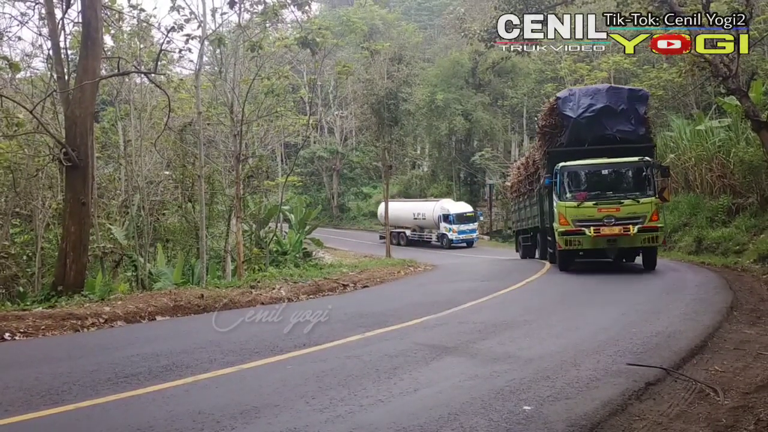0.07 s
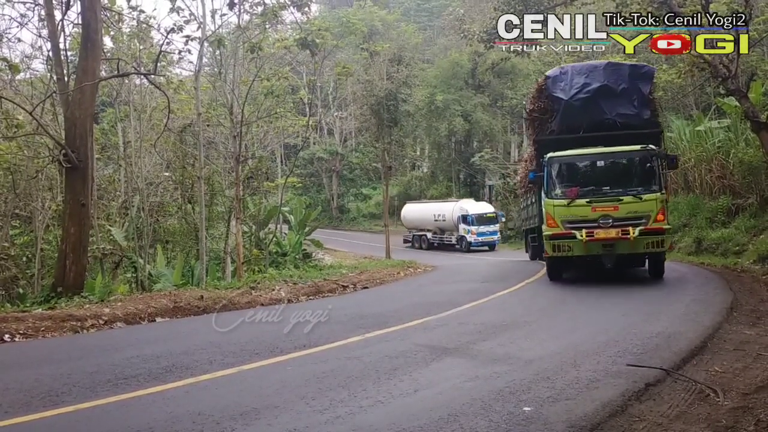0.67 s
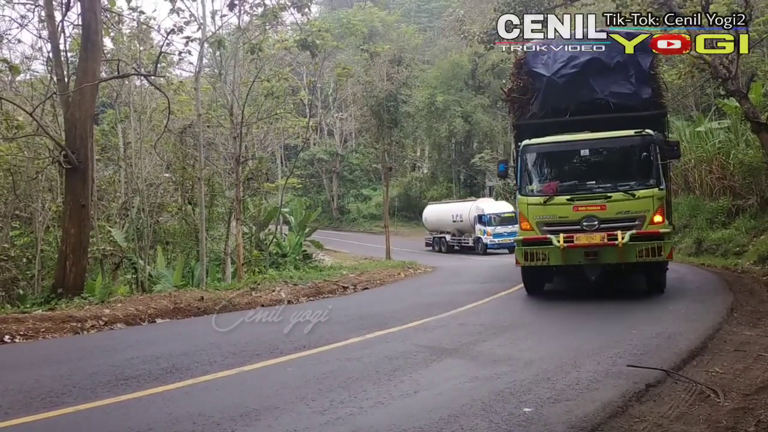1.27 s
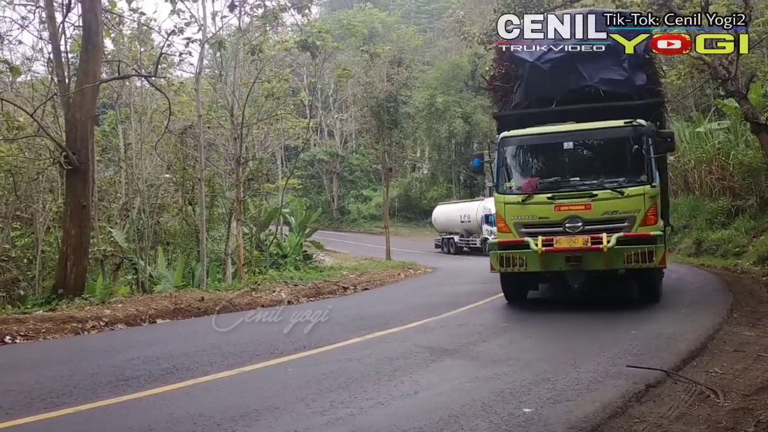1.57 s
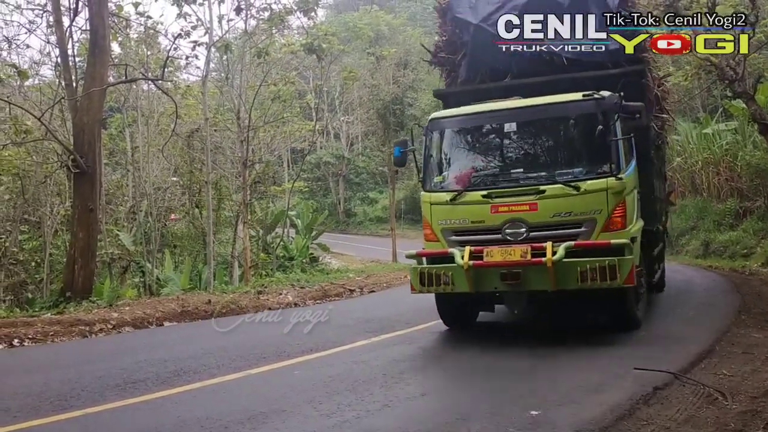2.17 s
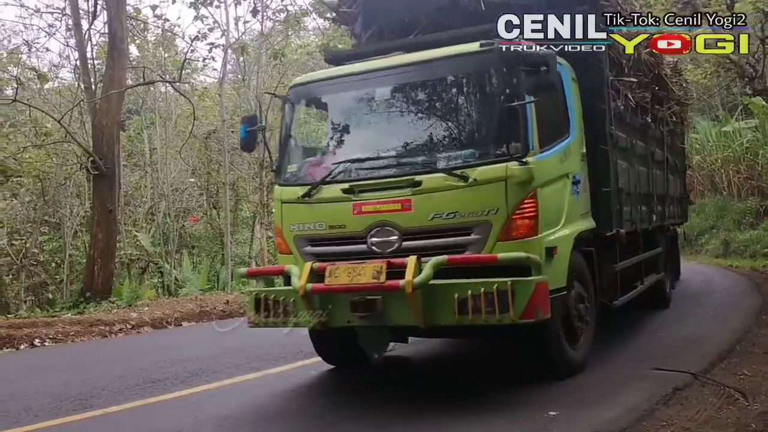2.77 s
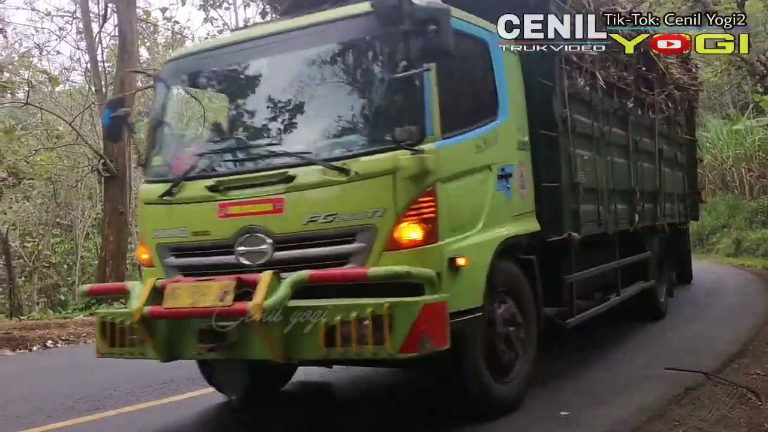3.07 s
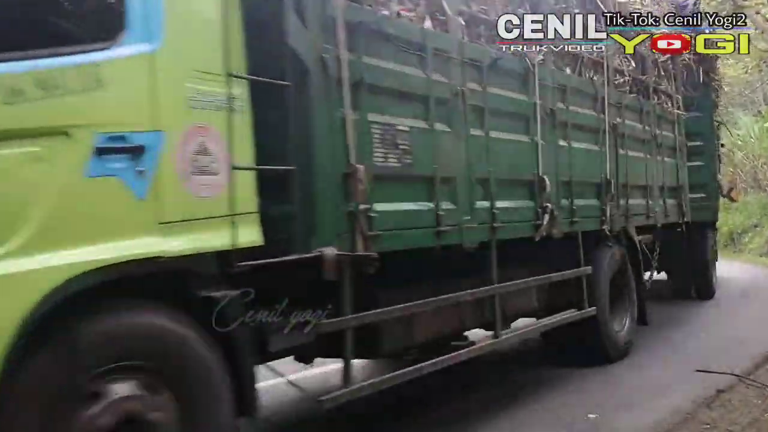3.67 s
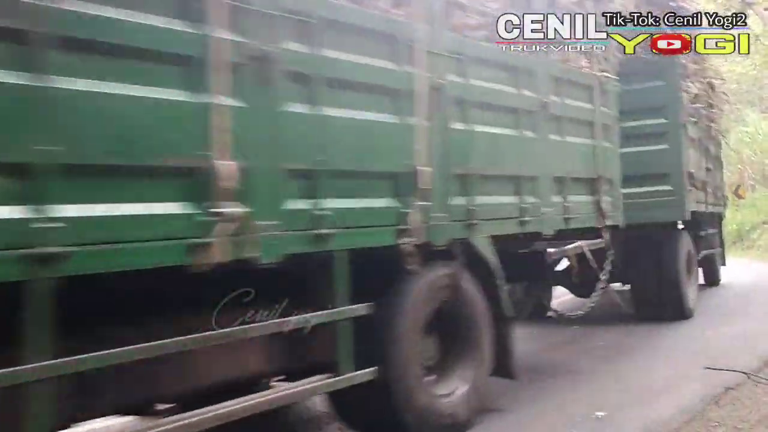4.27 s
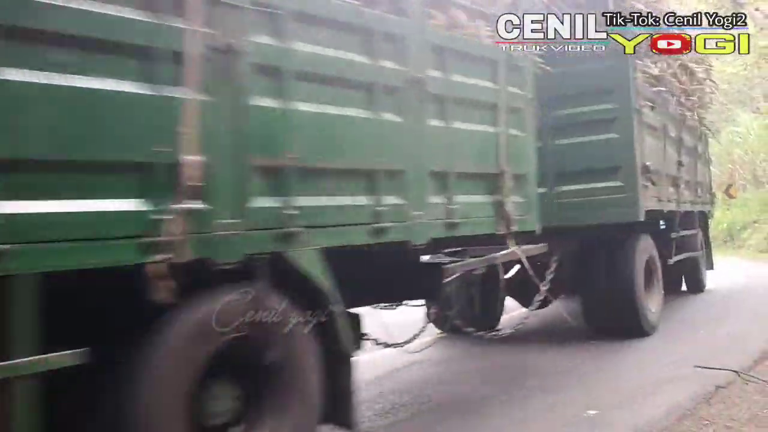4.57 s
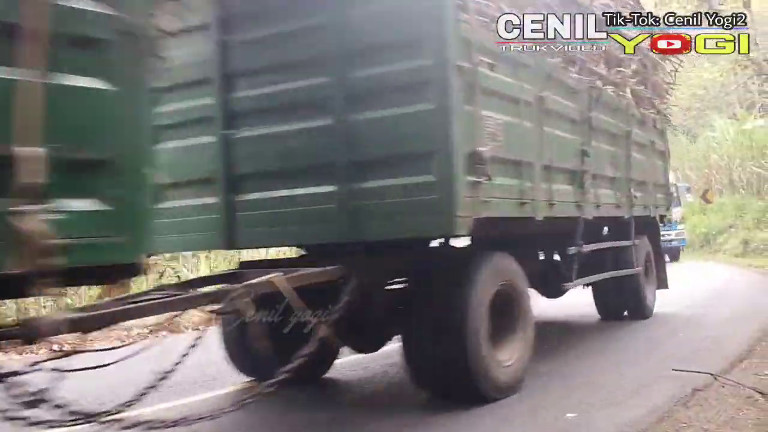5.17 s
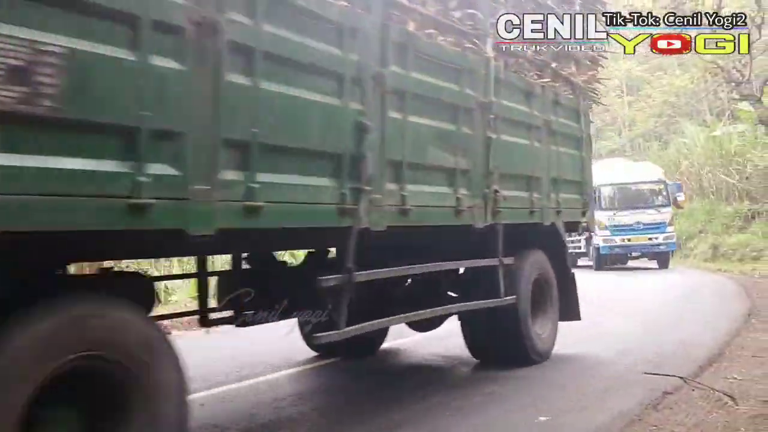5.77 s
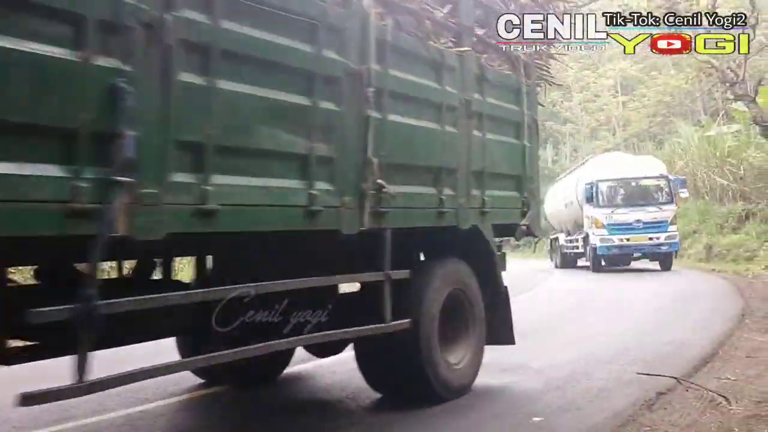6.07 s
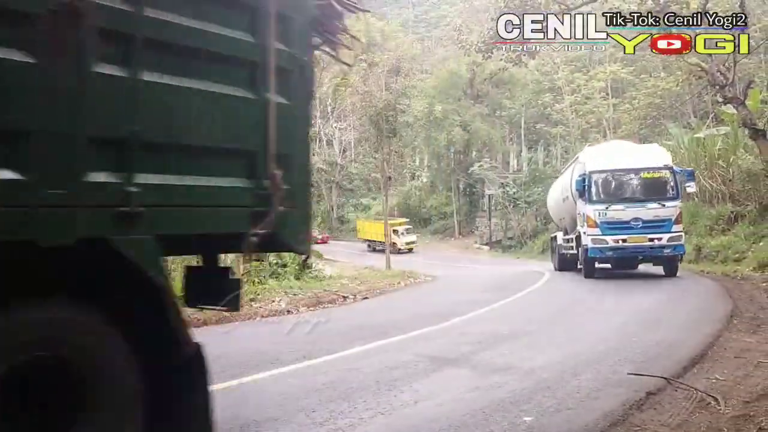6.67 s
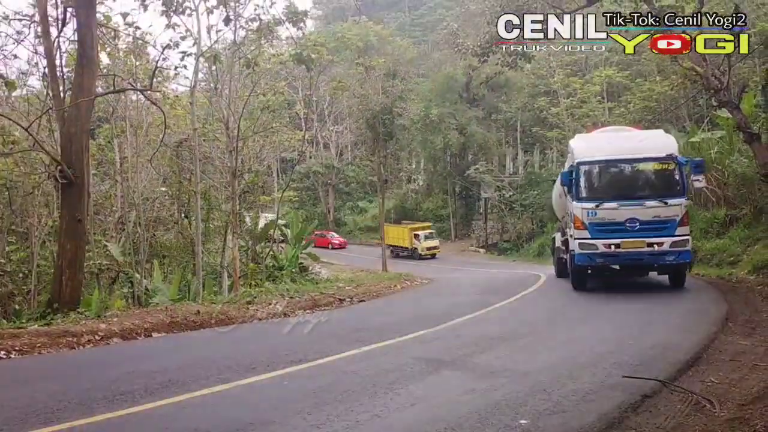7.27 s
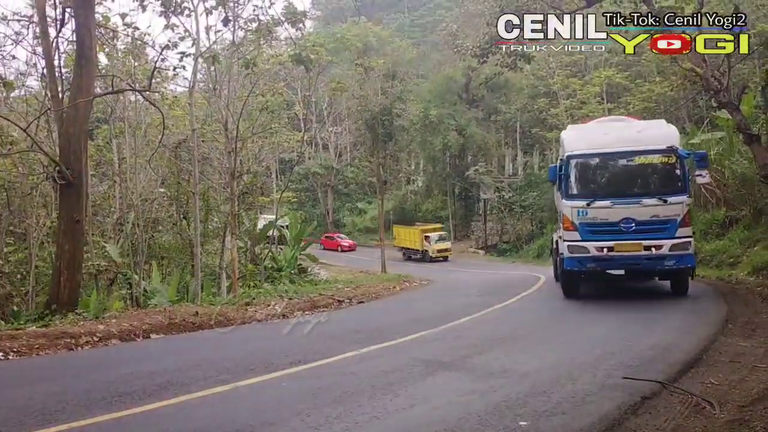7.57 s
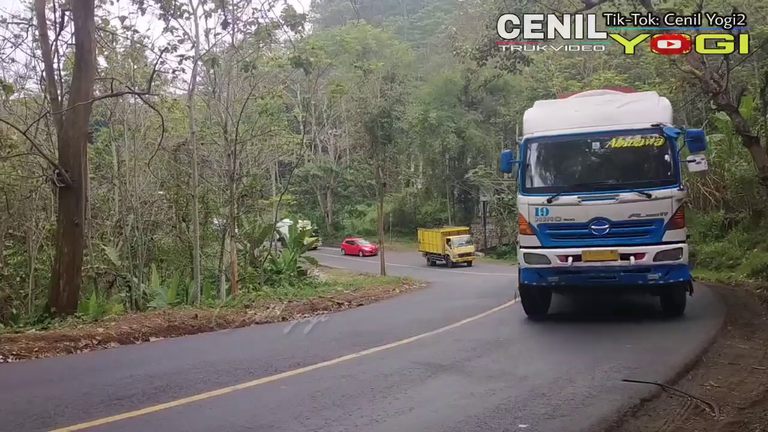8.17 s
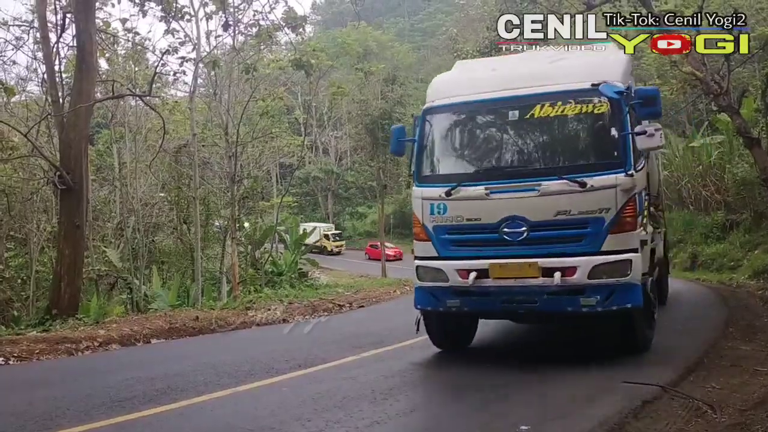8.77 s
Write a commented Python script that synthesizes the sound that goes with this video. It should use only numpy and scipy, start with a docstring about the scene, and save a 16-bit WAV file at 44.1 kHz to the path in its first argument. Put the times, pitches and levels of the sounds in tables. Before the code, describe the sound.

Heard from the verge of a forest road, a heavy truck's deep engine drone and rumble build steadily. After a short puff of air, the truck and its trailer go by close, with throbbing exhaust, roaring, hissing tyres and a gassy rasp with a thin metal ring. The noise drops away with a light, high squeal, leaving the lower hum of a following tanker and faint distant traffic.

```python
"""A low exhaust boom grows over road noise as a loaded six-cylinder diesel truck with a drawbar trailer
climbs a forest bend and passes a few metres away. Periodic firings give the boom and its overtones;
the block clatters, the tyres roar and hiss, metal rings thinly and gas rasps beside the pipe. A hollow
drone and a spit of air come before the pass, a thin squeal after it. A tanker follows, and the two
exhaust notes, close in frequency, beat."""
import sys
import numpy as np
from scipy import signal
from scipy.fft import rfft, irfft
from scipy.io import wavfile
from scipy.ndimage import uniform_filter1d, minimum_filter1d

SR = 44100
rng = np.random.default_rng(int(sys.argv[2]) if len(sys.argv) > 2 else 0)


def pcm_store(signal):
    """Save signal as 16-bit PCM."""
    levels = np.round(np.clip(np.atleast_2d(signal), -1, 1) * 32767)
    wavfile.write(sys.argv[1], SR, levels.astype(np.int16).T)


N = 388521
TIME = np.arange(N) / SR

# The truck's exhaust note, swelling and fading as the pipe moves round the bend.
# Each row: time in seconds, firing rate in Hz, level in dB.
TRUCK_EXHAUST = [(0, 87, -29), (.85, 82.7, -22.5), (1.1, 81.5, -24), (1.5, 80.2, -18.5),
                 (2.25, 78.3, -20.5), (3.4, 79.1, -13), (4.43, 80.5, -9), (4.85, 81.9, -2.8),
                 (5.32, 82.9, -8.5), (5.72, 84.2, -5), (6.13, 86.7, -9), (6.5, 85.6, -18),
                 (6.85, 86.4, -30), (7.22, 87.4, -21), (7.54, 86.1, -26), (7.95, 85, -47),
                 (8.38, 85.6, -28), (8.81, 86.2, -28)]
# The truck's overtones. Each row: multiple of the engine cycle, then relative level in dB from far in
# front, beside the cab, beside the flank and from behind.
TRUCK_OVERTONES = [(3, -15, -20, -14.5, -9.5), (4, -20, -16.5, -19, -12), (5, -21, -13, -18.5, -10),
                   (7, -26, -20, -15, -3.5), (8, -18, -11.5, -19, -9), (8.99, -14, -5.5, -5.5, 0),
                   (10.01, -17, -15.5, -18.5, -1.5), (10.95, -7.5, -4, -3.5, -14.5), (11.97, 1, -1, 1, -6),
                   (13, -21, -21.5, -11.5, -17.5), (15.1, -13, -13.5, -14, -12.5),
                   (16, -20, -18, -18, -17.5), (17.94, -18, -9, -12, -15.5), (18.97, -2, -3, -9.5, -11),
                   (20.86, -18, -16, -18.5, -21), (23.46, -12.5, -10, -9.5, -14.5),
                   (26.9, -21.5, -18.5, -14.5, -17), (30.07, -22, -22, -14, -16),
                   (36.1, -30, -26, -17.5, -19), (38, -19, -21.5, -19, -24), (42, -26, -21.5, -15, -23),
                   (60, -22, -21.5, -21, -31), (78, -25, -24.5, -24.5, -32)]
# The gain common to those overtones. Each row: time in seconds, gain in dB.
OVERTONE_GAIN = [(0, -35), (1.3, -34), (2.7, -29.5), (3.6, -28.7), (4.4, -21.7), (5.15, -23.7),
                 (6.4, -27.8), (7, -38), (8.81, -46)]
# The side facing the listener.
# Each row: time in seconds, side (0 far front, 1 cab, 2 flank, 3 trailer, 4 tanker).
FACING_SIDE = [(0, 0), (1.3, 0), (2.4, .9), (3.4, 1), (4.3, 1.75), (5.3, 2.5), (6.8, 3.1), (7.4, 4)]
# Spectra of the chassis rumble, the roar from each side, the hiss and the spit of air.
# Each row: frequency in Hz, relative level in dB.
RUMBLE_SPECTRUM = [(15, -18), (30, -4), (60, -2.5), (130, -1.5), (200, -0.7), (270, -1), (340, 3),
                   (420, -2), (520, -13), (700, -20.5)]
ROAR_FRONT = [(450, -3), (650, -1), (780, 2.5), (950, -4), (1080, 0.5), (1380, -4), (1800, -4.5),
              (2080, -6), (2380, -8), (2620, 0.5), (2850, -5.5), (3080, -2), (3400, -4), (3620, -2),
              (4100, -11.5)]
ROAR_CAB = [(450, -6.5), (570, -1), (780, 2), (1100, -0.5), (1550, -5), (2300, -8), (2850, -2),
            (3200, -1.5), (3700, -1), (4100, -4)]
ROAR_FLANK = [(450, 5), (650, 1), (900, 2), (1350, 3.2), (2100, 2), (2650, 3.5), (3100, 4), (3600, 1),
              (4100, -13.5)]
ROAR_TRAILER = [(450, -2.5), (700, 1), (1000, -3.5), (1500, 0.5), (2000, 1.2), (2600, 3.5), (2850, 2.5),
                (3050, 0), (3350, 1.2), (4100, -7.5)]
ROAR_TANKER = [(450, 0), (700, 1.5), (1000, -0.5), (1350, 3), (1650, -0.5), (2000, 1.2), (2800, 2),
               (3200, -1.5), (4100, -6)]
HISS_SPECTRUM = [(3400, -26), (4100, -5), (4700, -2.5), (5300, -4), (6000, -1.5), (6600, -1.5), (7100, -.5),
                 (7500, 3), (7800, -2), (8100, -11.5), (8400, -24)]
SPIT_SPECTRUM = [(3000, -17), (6300, -16), (7300, 1), (7700, -5), (8300, -19)]
# The passage of each truck sound. Each entry: time abreast in seconds, level then in dB, nearest
# distance in metres, loss in dB per doubling of distance while approaching and while receding.
TRUCK_PASSES = {"rumble": (4.85, -28.4, 4, 8, 15), "roar": (4.68, -21.6, 5, 18, 14.8),
                "hiss": (4.92, -24.1, 5, 12.2, 16.8), "ring": (5.35, -33.5, 1.6, 4.9, 9.5),
                "rasp": (5.2, -23.8, 1.6, 16.5, 15)}
# Other traffic. Each entry: level in dB of the tanker at its nearest, level in dB of distant vehicles.
OTHER_TRAFFIC = {"rumble": (-39.5, -51), "roar": (-47, -40.6), "hiss": (-40, -42.9)}
# A metallic ringing that travels with the truck. Each row: time in seconds, frequency in Hz.
RINGING_PITCH = [(0, 3040), (1.3, 3160), (3.7, 3200), (4.6, 3100), (5.3, 3130), (6.3, 3045), (7.3, 2940)]
# The tanker's exhaust note. Each row: time in seconds, firing rate in Hz, level in dB.
TANKER_EXHAUST = [(3.0, 73.7, -44), (5.3, 71.65, -33.5), (6.8, 73, -35), (7.15, 73.5, -28.5),
                  (7.5, 74.3, -34), (7.8, 74.15, -24), (8.35, 76.3, -25), (8.81, 78.7, -27)]
# Its overtones. Each row: multiple of the engine cycle, level in dB relative to the exhaust note.
TANKER_OVERTONES = [(11, -25), (12, -18), (16, -24), (18, -24), (24, -22), (28, -22)]
# Resonances of the rasp. Each row: frequency in Hz, bandwidth in Hz, relative level in dB.
GAP_RESONANCES = [(3117, 450, 5), (3700, 130, -6), (2600, 300, -9.5), (8100, 1800, -21.5)]
# Flares of ringing and rasp.
# Each row: start in seconds, length in seconds, ringing level in dB, rasp level in dB.
FLARES = [(3.62, .3, -31.5, -42), (4.52, .5, -31, -23.2), (5.03, .25, -24.5, -17.8), (6.2, .14, -35, -42),
          (6.52, .13, -34, -45), (6.92, .1, -42, -50)]


def undb(db):
    """Amplitude grows tenfold for every 20 dB."""
    return 10 ** (np.asarray(db) / 20)


def unit(x):
    """Normalisation to an rms of 1."""
    return x / np.sqrt(np.mean(x ** 2))


def curves(table):
    """Linear interpolation in time gives each later column a value per sample."""
    times, *columns = np.transpose(table)
    return [np.interp(TIME, times, column) for column in columns]


def wander(rate_hz):
    """Low-passed noise of rms 1 fluctuates about rate_hz times a second."""
    step, size = 20, 20000
    hz = np.arange(size // 2 + 1) * SR / step / size
    bins = rfft(rng.standard_normal(size)) * np.exp(-(hz / rate_hz) ** 2)
    return np.interp(np.arange(N) / step, np.arange(size), unit(irfft(bins)))


def noise(spectrum, band_hz=(0, SR)):
    """Spectral shaping of white noise, with steep skirts; the rms is 1 within the band."""
    hz = np.maximum(np.arange(N // 2 + 1) * SR / N, 1)
    points, db = np.transpose(spectrum)
    colour = undb(np.interp(np.log(hz), np.log(points), db))
    skirts = np.minimum(1, np.minimum(hz / points[0], points[-1] / hz)) ** 10
    bins = rfft(rng.standard_normal(N)) * colour * skirts
    low, high = band_hz
    return irfft(bins, N) / np.std(irfft(bins * (hz > low) * (hz < high), N))


def envelope(start, length, attack, release):
    """A linear rise and a hold give way to exponential decay; all times are in seconds."""
    age = TIME - start
    return np.clip(age / attack, 0, 1) * np.exp(-np.maximum(age - length, 0) / release)


def exhaust_note(firings, db, shake):
    """A silencer is a low-pass filter: it rounds the firings to an almost pure boom."""
    return np.sqrt(2) * undb(db) * np.cos(2 * np.pi * firings) * (1 + shake * wander(11))


def overtone(firings, order, unsteady, rate_hz):
    """Uneven combustion modulates a multiple of the six-firing cycle in amplitude and phase."""
    angle = 2 * np.pi * (order * firings / 6 + rng.random())
    in_phase = (1 + unsteady * wander(rate_hz)) * np.cos(angle)
    quadrature = unsteady * wander(rate_hz) * np.sin(angle)
    return np.sqrt(2 / (1 + 2 * unsteady ** 2)) * (in_phase + quadrature)


def truck_engine(firings, note_db, side):
    """Unequal cylinders and driven gear add overtones to the boom; directivity sets their balance."""
    gain_db, = curves(OVERTONE_GAIN)
    overtones = 0
    for order, *side_db in TRUCK_OVERTONES:
        directivity = undb(np.interp(side, range(4), side_db))
        overtones += directivity * overtone(firings, order, unsteady=.25, rate_hz=4)
    return exhaust_note(firings, note_db, shake=.039) + undb(gain_db) * overtones


def distance_ratio(abreast_s, nearest_m, speed_m_s=4):
    """On a straight path distance is a hypotenuse, here divided by its least value."""
    return np.hypot(1, speed_m_s * (TIME - abreast_s) / nearest_m)


def passing_gain(sound):
    """Spreading, and screening by cab and load, weaken a truck sound on either side of its pass."""
    abreast_s, db, nearest_m, approaching_db, receding_db = TRUCK_PASSES[sound]
    loss_db = np.where(TIME < abreast_s, approaching_db, receding_db)
    return undb(db - loss_db * np.log2(distance_ratio(abreast_s, nearest_m)))


def traffic_gain(sound):
    """Incoherent sources add in power: the truck, the approaching tanker and distant vehicles."""
    tanker_db, distant_db = OTHER_TRAFFIC[sound]
    tanker = undb(tanker_db) / distance_ratio(abreast_s=10.2, nearest_m=4)
    return np.sqrt(passing_gain(sound) ** 2 + tanker ** 2 + undb(distant_db) ** 2)


def chassis_rumble():
    """The road drives frame and load into random forced vibration."""
    return noise(RUMBLE_SPECTRUM, band_hz=(290, 520)) * undb(1.3 * wander(10))


def block_and_tyre_roar(firings, side):
    """Block clatter and tread noise, modulated by the firings, blend between sides at equal power."""
    roar = 0
    for index, spectrum in enumerate([ROAR_FRONT, ROAR_CAB, ROAR_FLANK, ROAR_TRAILER, ROAR_TANKER]):
        share = np.clip(1 - abs(side - index), 0, 1)
        roar += np.sqrt(share) * noise(spectrum, band_hz=(600, 2700))
    throb = 1 + .042 * np.cos(2 * np.pi * firings) + .036 * np.cos(4 * np.pi * firings)
    flicker_db = .42 * wander(150) + .52 * wander(33)
    return roar * throb * undb(flicker_db)


def air_hiss(firings):
    """Air squeezed from the treads and drawn through the engine radiates flow noise."""
    throb = 1 + .098 * np.cos(2 * np.pi * firings)
    return noise(HISS_SPECTRUM, band_hz=(5300, 7900)) * throb * undb(.35 * wander(25))


def rubbed_tone(hz, width_hz):
    """Irregular friction sustains a narrow resonance, whose amplitude and phase wander."""
    angle = 2 * np.pi * np.cumsum(hz * np.ones(N)) / SR
    return wander(width_hz) * np.cos(angle) + wander(width_hz) * np.sin(angle)


def metal_ringing():
    """A high resonance of drifting frequency is heard as a thin metallic ring."""
    hz, = curves(RINGING_PITCH)
    return rubbed_tone(hz, width_hz=100)


def hollow_drone():
    """A low resonance, perhaps of a body panel, swells for a moment."""
    swell = envelope(start=2.72, length=.17, attack=.06, release=.06)
    return undb(-31.5) * swell * rubbed_tone(hz=195, width_hz=6)


def air_spit():
    """A valve releases a jet of air, whose bright noise decays exponentially with a faint tail."""
    start_s, attack_s, decay_s, tail_s = 2.747, .002, .013, .082
    age = np.maximum(TIME - start_s, 0)
    rise = 1 - np.exp(-age / attack_s)
    fall = np.exp(-age / decay_s) + undb(-10) * np.exp(-age / tail_s)
    return undb(-24) * rise * fall * noise(SPIT_SPECTRUM)


def tanker_engine():
    """A second six-cylinder emerges from the bend; its lower note beats with the truck's."""
    hz, db = curves(TANKER_EXHAUST)
    firings = np.cumsum(hz) / SR
    fade_in = np.minimum(TIME / TANKER_EXHAUST[0][0], 1) ** 2
    overtones = sum(undb(relative_db) * overtone(firings, order, unsteady=.3, rate_hz=5.4)
                    for order, relative_db in TANKER_OVERTONES)
    return fade_in * (exhaust_note(firings, db, shake=.04) + undb(db) * overtones)


def gas_rasp(firings):
    """Each firing forces a puff of gas through a narrow gap, exciting resonances near 3 kHz."""
    sharpness, scatter_db = 2, 3.4
    puffs = np.exp(sharpness * np.cos(2 * np.pi * (firings - .04))) * undb(scatter_db * wander(60))
    gas = puffs * rng.standard_normal(N)
    rasp = 0
    for hz, width_hz, db in GAP_RESONANCES:
        # Two passes through a wider resonator give about the listed bandwidth.
        b, a = signal.iirpeak(hz, hz / (1.5 * width_hz), fs=SR)
        rasp += undb(db) * signal.lfilter(b, a, signal.lfilter(b, a, gas))
    return unit(rasp)


def flaring_gains():
    """For ringing and rasp alike, brief flares add in power to a part that passes with the truck."""
    flares = sum(np.outer(undb(levels_db), envelope(start, length, attack=.04, release=.04))
                 for start, length, *levels_db in FLARES)
    return np.hypot(flares, [passing_gain("ring"), passing_gain("rasp")])


def squeal():
    """Friction, perhaps at a brake lining, excites a thin tone that sags in pitch and lingers faintly."""
    start_s, length_s, attack_s = 6.75, .51, .12
    start_hz, sag_hz_per_s = 4890, 170
    hz = start_hz - sag_hz_per_s * (TIME - start_s)
    held = envelope(start_s, length_s, attack_s, release=.08)
    tail = undb(-7.5) * envelope(start_s, length_s, attack_s, release=.45)
    return undb(-37.8) * np.maximum(held, tail) * rubbed_tone(hz, width_hz=170)


def scene():
    """The sounds of both trucks superpose at one point on the verge."""
    firing_hz, note_db = curves(TRUCK_EXHAUST)
    firings = np.cumsum(firing_hz) / SR
    side, = curves(FACING_SIDE)
    ringing_gain, rasp_gain = flaring_gains()
    engines = truck_engine(firings, note_db, side) + rasp_gain * gas_rasp(firings) + tanker_engine()
    rumble = traffic_gain("rumble") * chassis_rumble()
    roar = traffic_gain("roar") * block_and_tyre_roar(firings, side)
    hiss = traffic_gain("hiss") * air_hiss(firings)
    tones = ringing_gain * metal_ringing() + squeal() + hollow_drone()
    return (engines + rumble + roar + hiss + tones + air_spit())[None]


def record(dry):
    """Fast limiting holds the peaks under full scale; a steep low-pass filter cuts the top treble."""
    ceiling, window_samples, cutoff_hz = .97, 201, 8350
    gain = ceiling / np.maximum(abs(dry), ceiling)
    gain = uniform_filter1d(minimum_filter1d(gain, window_samples), window_samples)
    low_pass = signal.ellip(10, .2, 75, cutoff_hz, fs=SR, output="sos")
    return signal.sosfilt(low_pass, dry * gain)


dry = scene()
out = record(dry)
pcm_store(out)
```